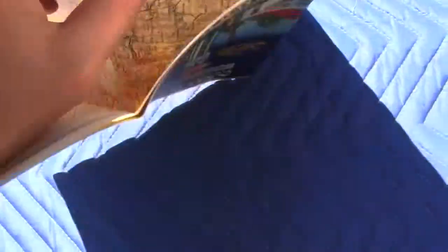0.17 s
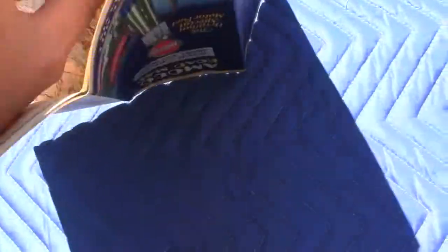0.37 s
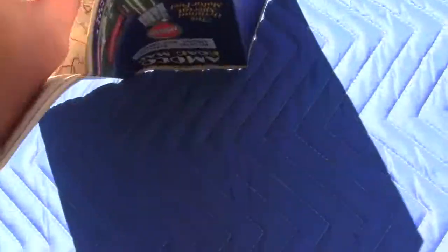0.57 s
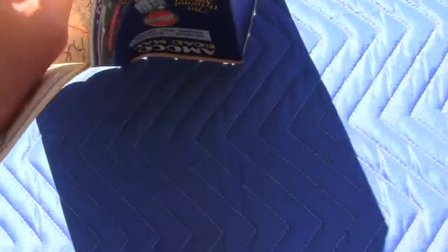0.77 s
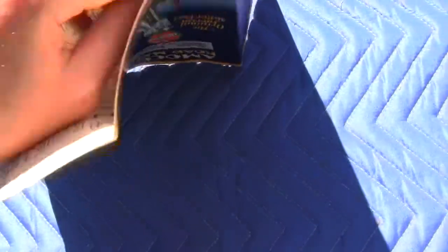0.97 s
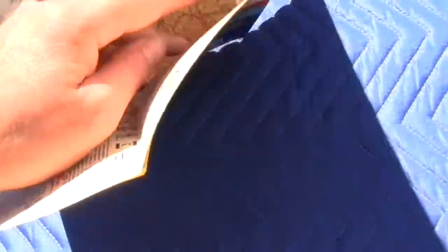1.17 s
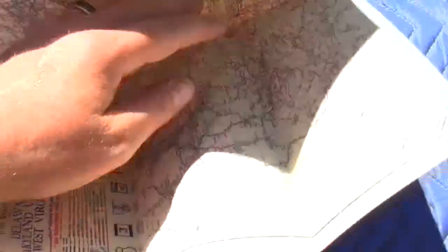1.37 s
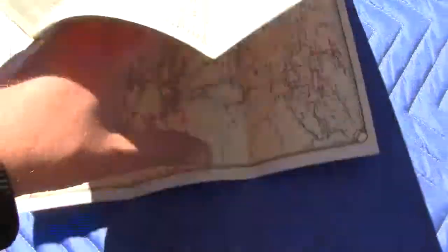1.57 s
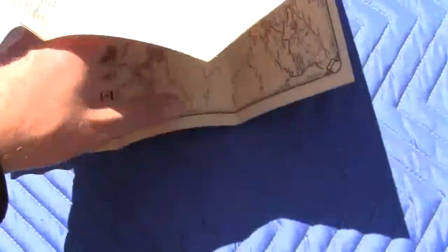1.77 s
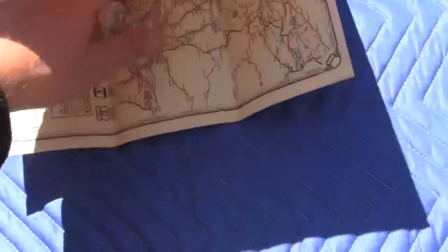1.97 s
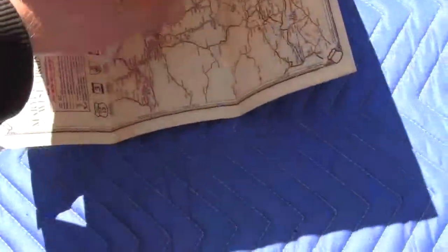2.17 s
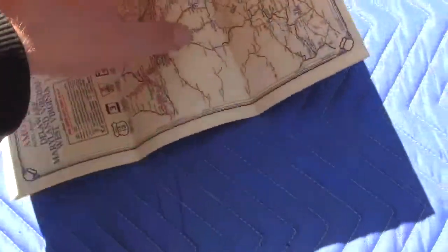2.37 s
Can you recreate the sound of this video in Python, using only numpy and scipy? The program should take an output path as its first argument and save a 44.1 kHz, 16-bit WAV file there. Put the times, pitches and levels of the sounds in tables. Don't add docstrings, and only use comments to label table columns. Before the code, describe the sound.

A folded paper map opens by hand, close and dry, outdoors. From 0 to 0.4 s, faint sliding, small crinkles, snaps and dull panel flaps; sparse light ticks and rubbing until 1 s. Loud crackling bursts at 1.1, 1.25 and 1.55 s, with rustling between. Separate snaps around 1.8, 1.95 and 2.2 s, then a final crackle near 2.35 s. Low wind rumbles softly, gusting around 1.2 s.

```python
import sys
import numpy as np
from scipy import signal
from scipy.fft import rfft, irfft, next_fast_len
from scipy.io import wavfile
from scipy.ndimage import uniform_filter1d, map_coordinates

SR = 44100
rng = np.random.default_rng(int(sys.argv[2]) if len(sys.argv) > 2 else 0)


def voltage_ratio(level):
    return 10 ** (np.asarray(level, float) / 20)


def store_pcm(level_fs):
    pcm = np.round(np.clip(level_fs, -1, 1) * 32767).astype(np.int16)
    wavfile.write(sys.argv[1], SR, np.atleast_2d(pcm).T)


N = 106413


def unit(x):
    return x / np.sqrt(np.mean(x ** 2) + 1e-20)


def along(points, hz):
    f, value = np.transpose(points)
    return np.interp(np.log(hz + 1), np.log(f + 1), value)


def wobble(rate):
    knots = rng.standard_normal(int(N * rate / SR) + 4)
    return map_coordinates(knots, [np.arange(N) * rate / SR])


def filtered(x, response):
    m = next_fast_len(N + 8192)
    return irfft(rfft(x, m) * response(np.fft.rfftfreq(m, 1 / SR)), m)[..., :N]


def rush(spectrum, alike, patchy_db):
    z = signal.stft(rng.standard_normal((2, N)), nperseg=512)[2]
    patches = uniform_filter1d(rng.standard_normal(z.shape[1:]), size=8, axis=0)
    patches = uniform_filter1d(patches, size=5, axis=1)
    pair = signal.istft(z * voltage_ratio(patchy_db * unit(patches)), nperseg=512)[1][:, :N]

    def mid_side(hz):
        turn = np.arccos(np.clip(along(alike, hz), -1, 1)) / 2
        return voltage_ratio(along(spectrum, hz)) * [np.cos(turn), np.sin(turn)]

    mid, side = filtered(pair, mid_side)
    return unit(np.array([mid + side, mid - side]))


def slips(s, gain, hz, cycles, size=200):
    turns = np.arange(size) / SR * hz[:, None]
    soft_start = 1 - np.exp(-(turns / 0.35) ** 2)
    wiggle = gain[:, None] * np.sin(2 * np.pi * turns) * np.exp(-turns / cycles) * soft_start
    at = np.round(s * SR).astype(int)[:, None] + np.arange(size)
    return np.bincount(at.ravel().clip(0, N), wiggle.ravel(), N + 1)[:N]


# [f/Hz, level/dB per Hz]
AIR_COLOUR = [(150, -7), (250, 2.5), (690, -3.5), (1100, -8.5), (3400, -18.5), (6000, -16.5),
              (10300, -24.5), (12700, -35)]
# [f/Hz, likeness 0..1]
AIR_LIKENESS = [(300, .7), (900, .97), (1500, .99), (1750, .5), (2050, .995), (4000, 1), (11300, 1),
                (12300, .2)]


def open_air():
    return voltage_ratio(-39) * rush(AIR_COLOUR, AIR_LIKENESS, patchy_db=1.5)


# [t/s, level/dB]
GUSTS = [(0, -42), (.3, -48.5), (.4, -42), (.46, -39), (.53, -44), (.65, -39.5), (.78, -44.5), (.86, -37.5),
         (1.06, -47), (1.15, -32), (1.23, -33), (1.29, -43), (1.42, -38), (1.5, -45), (1.62, -48),
         (1.75, -45.5), (2.1, -44.5), (2.3, -44), (2.39, -35.5)]
# [f/Hz, level/dB per Hz]
WIND_COLOUR = [(20, -46), (40, -4.5), (70, 3), (150, 5.5), (270, -7), (400, -23), (800, -31), (2500, -120)]
# [f/Hz, likeness 0..1]
PORT_LIKENESS = [(30, .95), (90, .65), (180, .2), (350, .4)]


def wind():
    s, db = np.transpose(GUSTS)
    strength = voltage_ratio(np.interp(np.arange(N) / SR, s, db) + 8)
    own_lumps_db = 1.2 * np.array([wobble(12), wobble(6.32)])
    shared_gust_db = 0.8 * wobble(7.58)
    rumble = rush(WIND_COLOUR, PORT_LIKENESS, patchy_db=0.6)
    return strength * unit(voltage_ratio(own_lumps_db + shared_gust_db) * rumble)


# [t/s, length/s, finger hiss level/dB, sheet rustle level/dB]
SLIDING_STROKES = [(0, 0.12, -49, -50), (0.172, 0.038, -36.5, -49), (0.207, .075, -41, -47),
                   (.283, 0.038, -36, -41), (0.342, 0.091, -41, -49), (0.613, 0.082, -44.5, -44.5),
                   (0.778, 0.039, -45, -38.5), (1.002, 0.197, -42.5, -42.5), (1.102, 0.017, -42, -29.5),
                   (1.224, 0.083, -40, -35), (1.306, 0.072, -52, -37), (1.416, 0.073, -40.5, -41.5),
                   (1.475, 0.11, -40, -33), (1.597, 0.067, -41, -33), (1.7, 0.1, -38, -41),
                   (1.932, 0.071, -66, -35), (2.033, 0.15, -56, -40), (2.093, 0.14, -44.5, -42.5),
                   (1.679, 0.014, -36.5, -34), (2.284, 0.093, -44, -39.5), (2.334, 0.068, -66, -30.5)]
# [f/Hz, level/dB per Hz]
FINGER_COLOUR = [(800, 12), (2000, 7), (4000, 6.5), (6500, 7.5), (9000, 0), (13000, -9.5)]


def slides(count=9000):
    t = np.arange(N) / SR
    edge_s, fade_s = 0.014, 0.022
    strokes = []
    for start, length, *_ in SLIDING_STROKES:
        rise, fall = (t - start) / edge_s, (start + length - t) / fade_s
        strokes.append(np.clip(np.minimum(rise, fall) + 0.5, 0, 1))
    power = voltage_ratio(2 * np.array(SLIDING_STROKES)[:, 2:])
    finger, sheet = np.sqrt(power.T @ np.array(strokes) ** 2)

    hiss = rush(FINGER_COLOUR, [(1000, 0.72)], patchy_db=1.4)[0]
    hiss = hiss * voltage_ratio(1.3 * wobble(40.2))

    u, g = rng.random((2, count)), rng.standard_normal((2, count))
    size = np.sign(g[0]) * voltage_ratio(-2.5 * np.log(u[1]))
    pitch_hz = 1300 * np.exp(0.643 * g[1])
    grains = slips(u[0] * N / SR, size, pitch_hz, cycles=1.3)
    rustle = unit(grains * voltage_ratio(2.2 * wobble(59.81)))
    return finger * hiss + sheet * rustle


# [t/s, peak level/dB, f/Hz, t60/s]
PANEL_FLAPS = [(0.069, -22.5, 283, 0.038), (0.165, -17.5, 352, 0.017), (0.306, -19, 272, 0.032),
               (0.406, -28.5, 463, 0.063), (1.007, -24.5, 310, 0.026), (1.1069, -10.5, 271, 0.02),
               (1.215, -20, 350, 0.039), (1.249, -28, 313, 0.12), (1.5605, -15, 284, 0.02),
               (1.5715, -17, 347, 0.024), (1.305, -18.5, 516, 0.011), (1.485, -26.5, 308, 0.013),
               (2.059, -23.5, 314, 0.018), (2.1965, -22.5, 360, 0.021), (2.205, -18, 360, 0.014),
               (2.347, -22, 320, 0.029), (2.368, -24.5, 260, 0.042)]


def flaps():
    out, t = np.zeros(N + SR), np.arange(SR // 8) / SR
    onset = 1 - np.exp(-t / 0.00047)
    for s, db, hz, t60 in PANEL_FLAPS:
        phase = 2 * np.pi * hz * t * (1 - 3 * t)
        push = voltage_ratio(db + 6 - 60 * t / t60) * np.sin(phase) * onset
        out[round(s * SR):][:len(t)] -= push
    return out[:N]


def creases(rows, shape_db, count=24):
    slips_per_ms, cycles, size_db = 2.6, 0.91, -1.5
    tail_t60_s, tail_db = 0.03, -11
    out, k = np.zeros(N), np.arange(count)
    for s, db, hz, ms, edge_db in rows:
        u, g = rng.random((4, count)), rng.standard_normal((5, count)).clip(-2, 2)
        g[:4, 0], u[:2, 0] = 0, 0
        after_ms = (k + u[0]) / slips_per_ms
        at = s + after_ms / 1e3
        going = np.clip((ms - after_ms) * slips_per_ms + 1, 0, 1)
        gain = going * voltage_ratio(db + 2.5 + shape_db(after_ms / ms)) * np.sign(u[1] - 0.5)
        out += slips(at, gain * voltage_ratio(size_db * g[0]), hz * np.exp(0.38 * g[1]), cycles)
        out += slips(at, gain * voltage_ratio(edge_db + size_db * g[2]), 4830 * np.exp(0.17 * g[3]), cycles)
        late = (k + u[2]) / count * tail_t60_s / 2
        tail_gain = voltage_ratio(db + tail_db - 60 * late / tail_t60_s) * g[4]
        out += slips(s + ms / 1e3 + late, tail_gain, hz * 0.55 * 2.6 ** u[3], cycles)
    return out


# [t/s, peak level/dB, f/Hz, length/ms, bright edge level/dB]
FOLD_CRINKLES = [(.070, -33, 1410, 20, -18), (.1665, -20.5, 1010, 3.6, 1), (.166, -13.5, 2380, 5.2, -23),
                 (.400, -20, 1560, 11.7, 0), (1.101, -18.5, 2570, 7, -9), (1.286, -25.5, 1880, 14, -13),
                 (1.3025, -19, 3600, 5.3, -8), (1.333, -24, 1030, 7.2, -9), (1.499, -24, 1580, 29, -22),
                 (1.609, -19.5, 1910, 31, -6), (1.963, -22, 920, 9.2, -18), (2.044, -24, 1300, 4, -1.5),
                 (2.288, -31, 1790, 24, -25), (2.341, -23, 1800, 18, -19), (2.354, -16, 2350, 8.2, -10)]


def crinkles():
    return creases(FOLD_CRINKLES, lambda u: -6 * (2 * (u - 0.37)) ** 2, count=52)


# [t/s, level/dB, f/Hz, life/cycles]
FACET_TICKS = [(.1654, -14, 2240, 1.2), (.1666, -13, 966, 3.4), (0.234, -16, 1830, 3.5),
               (.404, -24.5, 650, 6.5), (1.0975, -6.5, 1590, 0.86), (1.0991, -3.5, 1920, 0.83),
               (1.0992, -13.5, 1070, 4.5), (1.101, -16, 2020, 2.5), (1.1069, -7.5, 1730, 1.1),
               (1.1115, -21, 1980, 2.1), (1.116, -27, 1830, 2.6), (1.1205, -33, 2200, 2.1),
               (1.2475, -19, 1490, 2.5), (1.2523, 0.5, 2660, 0.74), (1.2525, -9, 1833, 6.7),
               (1.2526, -2.5, 4530, 2.3), (1.2528, -11, 6400, 3.6), (1.253, -12.5, 720, 2.6),
               (1.255, -5, 4220, 4.3), (1.2556, -7, 3660, 1.4), (1.2556, -5, 6930, 6.6),
               (1.2558, -16, 9300, 8.4), (1.2568, -5, 3040, 2.8), (1.2925, -21, 1870, 3.7),
               (1.303, -14, 2170, 1.4), (1.3045, -14, 2890, 4.9), (1.322, -3, 800, 0.59),
               (1.3228, -18, 2000, 1.8), (1.3325, -22, 1090, 2.9), (1.336, -19, 1390, 2.2),
               (1.3408, -11.5, 1350, 1.6), (1.5688, -32, 2400, 1.5), (1.5695, -1, 2300, 1.2),
               (1.57, 4, 4200, 1.9), (1.5701, -3, 6300, 2.2), (1.5707, -7, 3100, 2.2), (1.57, -12, 9700, 5),
               (1.965, -20, 710, 2.5), (2.1721, -3.5, 2470, 1.2), (2.1724, -14.5, 4830, 3.4),
               (2.1725, -14, 1110, 1.4), (2.1732, -18, 3870, 1.7), (2.1752, -19, 1970, 3.4),
               (2.202, -3.5, 534, 0.77), (2.344, -22, 2400, 3), (2.3475, -16, 1300, 1.6),
               (2.3515, -10, 1410, 2.1), (2.357, -17, 1743, 10), (2.382, -8, 1100, 1.5),
               (2.3921, 0.5, 1570, 0.87)]


def ticks():
    s, db, hz, cycles = np.transpose(FACET_TICKS)
    return slips(s, voltage_ratio(db), hz, cycles[:, None], size=500)


# [t/s, peak level/dB, f/Hz, length/ms, bright edge level/dB]
CREASE_SNAPS = [(.100, -26.5, 1300, 8.8, -10), (.1445, -16.5, 1670, 2.7, -4), (.2312, -18, 1500, 3.3, 5),
                (.303, -18.5, 1800, 2.3, 5), (.4015, -20, 3040, 5, 2), (.624, -28, 2440, 2.9, 4.5),
                (.823, -25, 1800, 5.6, 4), (1.1085, -23.5, 2140, 3.5, -14),
                (1.2522, -14.5, 1810, 4.3, 11.5), (1.2572, -23.5, 2470, 4.9, 11.5),
                (1.324, -20, 1230, 3.9, -13), (1.446, -21, 2820, 2.3, 1), (1.540, -13, 2340, 3.4, -2.5),
                (1.560, -12.5, 1200, 1.4, -8), (1.811, -15, 1940, 1.6, -4), (1.9405, -11.5, 1920, 1.8, -8),
                (1.9412, -11.5, 1050, 1.5, -30), (1.9632, -22, 1810, 2.2, -17),
                (1.970, -23, 2070, 3.5, -20), (2.105, -21, 940, 2.5, -9), (2.1715, -17.5, 2430, 2.9, -2),
                (2.2022, -23, 2200, 0.93, -20), (2.384, -25, 1520, 3.8, -25),
                (2.3935, -21, 1770, 0.18, -31)]


def snaps():
    return creases(CREASE_SNAPS, lambda u: -4 * u)


# [f/Hz, level/dB]
TREBLE_LIFT = [(7700, 0), (8600, 0), (9500, 5), (11000, 2), (13000, 2)]


def off_the_sheet(paper):
    def response(hz):
        bass_loss = 1j * hz / (140 + 1j * hz)
        treble_loss = 1 / (1 + 1j * hz / 9200) ** 2
        return voltage_ratio(along(TREBLE_LIFT, hz)) * bass_loss * treble_loss

    return filtered(paper, response)


# [f/Hz, side level/dB]
SIDE_LEVEL = [(300, -49), (900, -29), (1450, -35.5), (1700, -9.5), (2050, -32), (3700, -31), (5700, -33),
              (8600, -41), (12300, -8)]


def spread(paper):
    lag_s = 0.00074
    side = filtered(paper, lambda hz: voltage_ratio(along(SIDE_LEVEL, hz)) * np.exp(-2j * np.pi * hz * lag_s))
    return np.array([paper + side, paper - side])


def scene():
    paper = off_the_sheet(snaps() + crinkles() + ticks() + flaps()) + slides()
    return open_air() + wind() + spread(paper)


def roll_off(x):
    return signal.sosfilt(signal.butter(12, 13600, fs=SR, output="sos"), x)


# [f/Hz, level/dB]
CAPSULE = [(900, -0.5), (1300, -1.5), (1800, 3), (6800, 0.5), (8500, 1.5), (9700, 4), (11000, 5.5)]


def record(dry):
    top_hz, ceiling = 13400, 0.95
    mix = filtered(dry, lambda hz: voltage_ratio(along(CAPSULE, hz)) * np.clip((top_hz - hz) / 800, 0, 1))
    mix = mix / (1 + np.abs(mix / ceiling) ** 8) ** (1 / 8)
    return roll_off(mix)


dry = scene()
out = record(dry)
store_pcm(out)
```